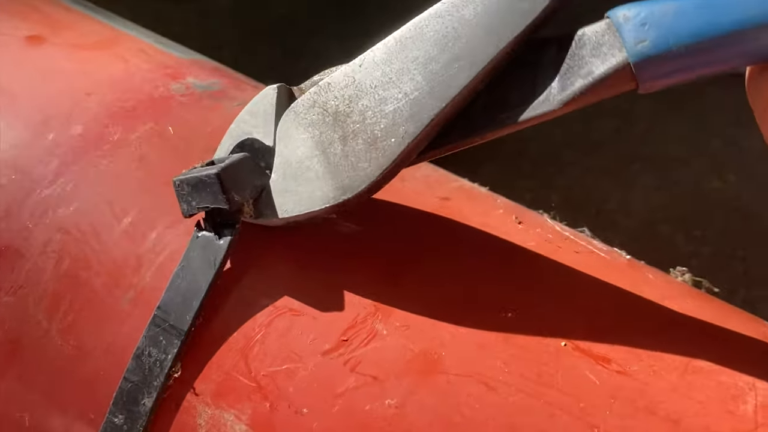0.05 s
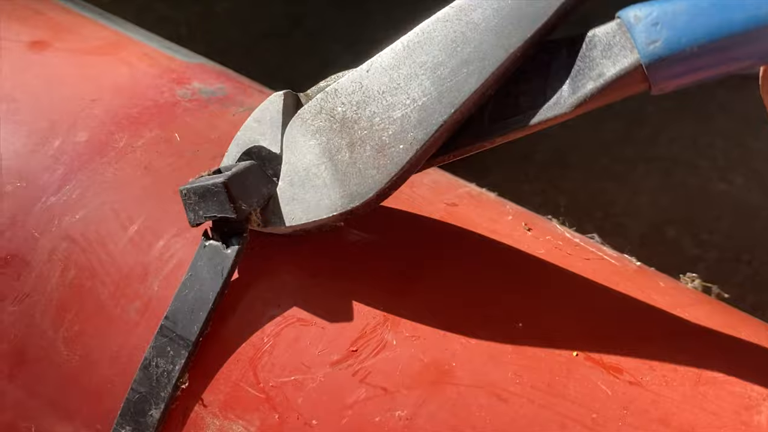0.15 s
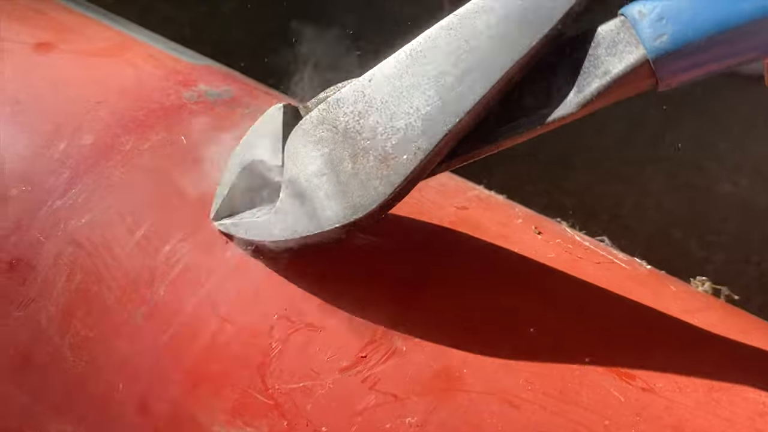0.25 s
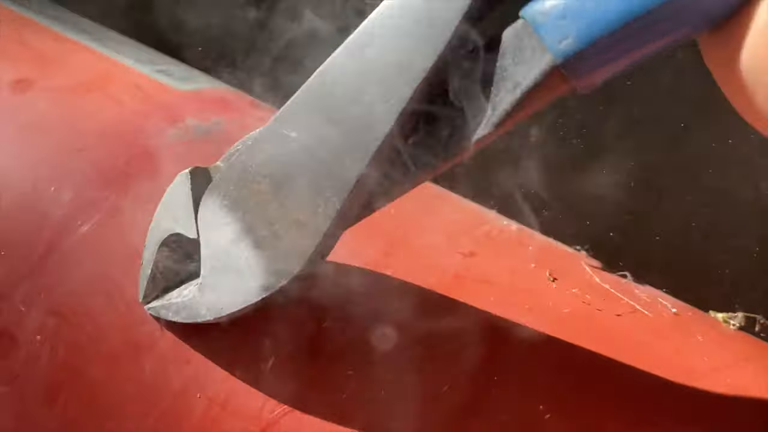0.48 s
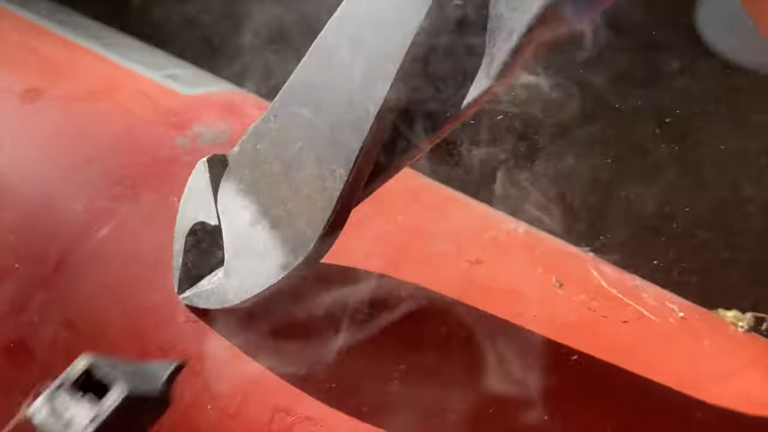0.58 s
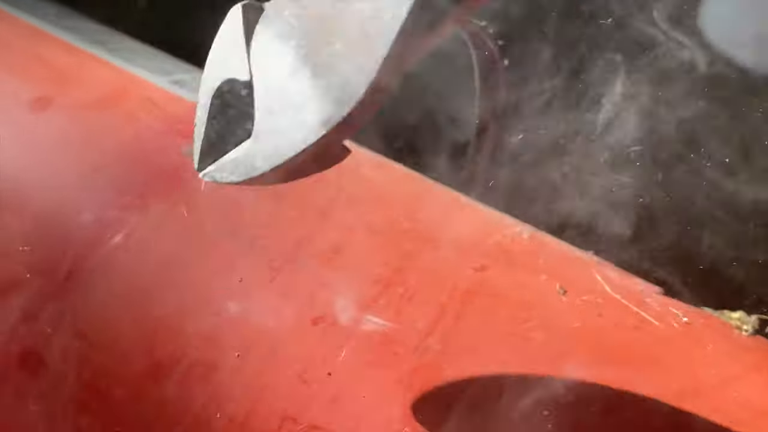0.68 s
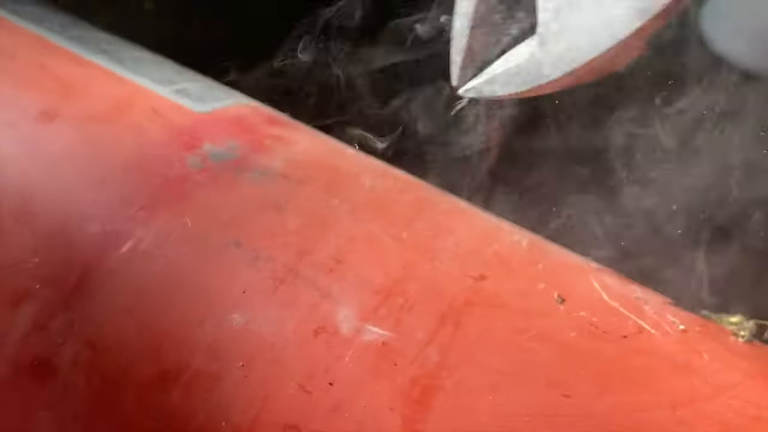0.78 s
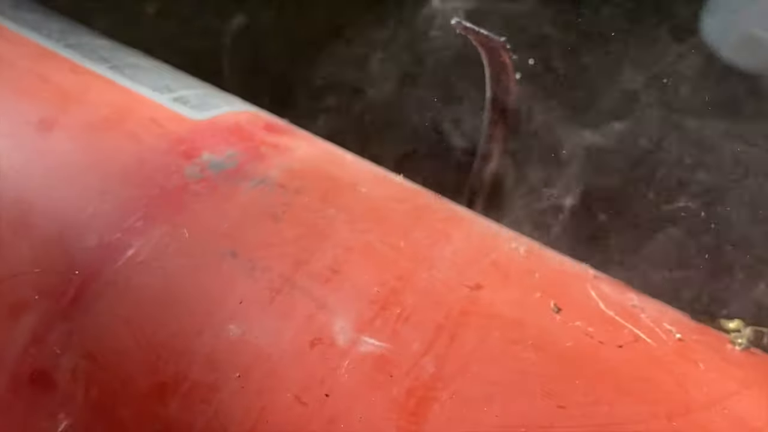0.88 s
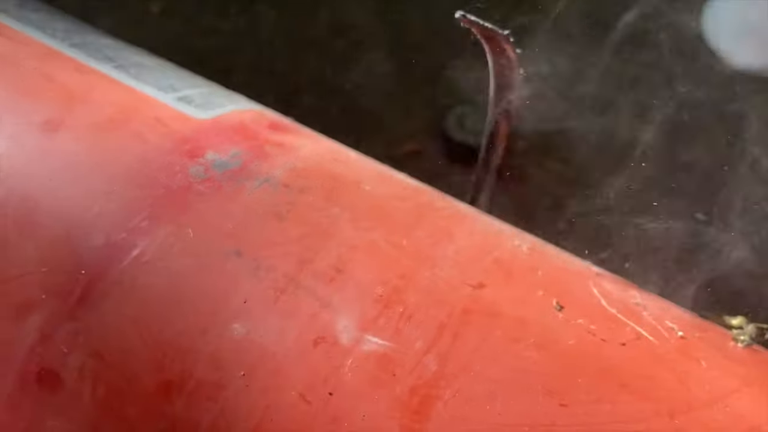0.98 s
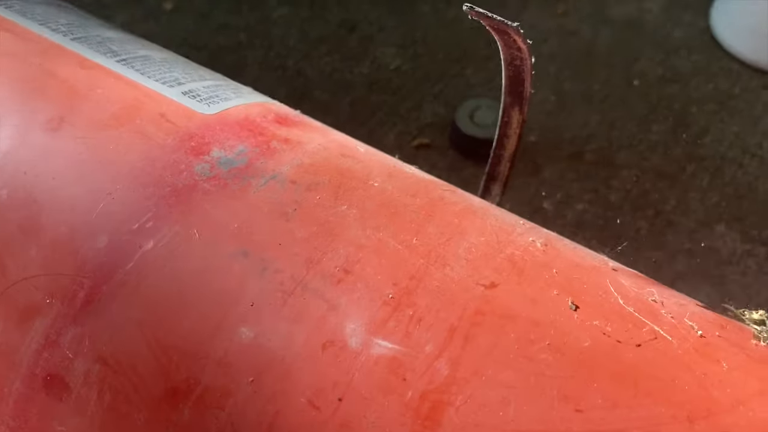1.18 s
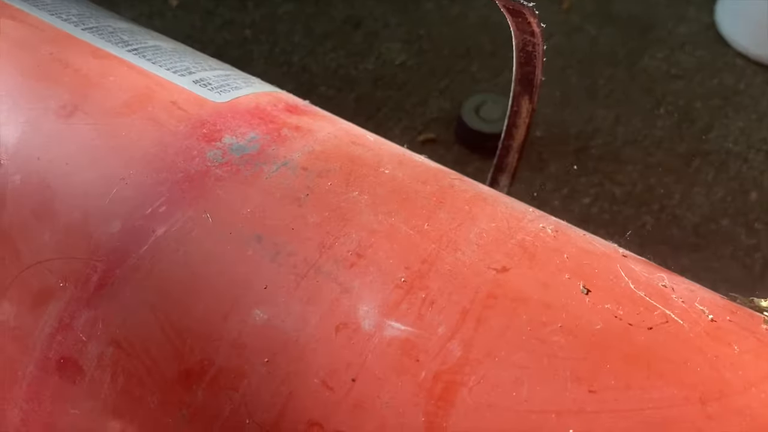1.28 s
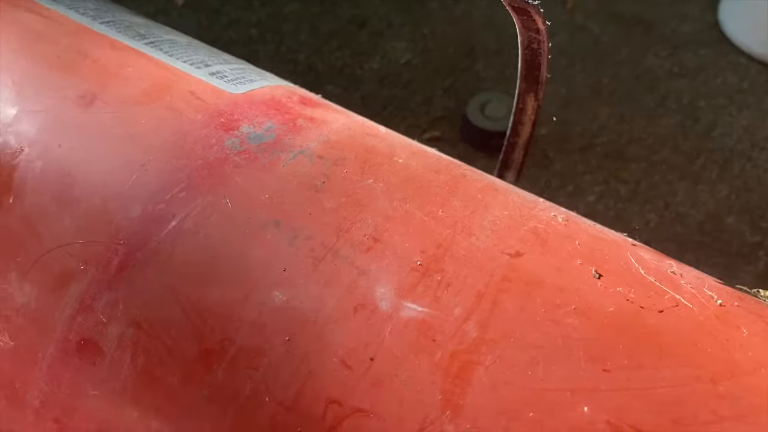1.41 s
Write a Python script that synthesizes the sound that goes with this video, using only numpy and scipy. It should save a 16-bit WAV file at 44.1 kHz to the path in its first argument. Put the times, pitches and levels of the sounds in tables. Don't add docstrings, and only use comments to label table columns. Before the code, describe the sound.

A thick plastic tie creaks and snaps under steel cutters, with a thump and bright metallic rattle

```python
import sys
import numpy as np
from scipy import signal
from scipy.fft import rfft, irfft, next_fast_len
from scipy.io import wavfile
from scipy.ndimage import map_coordinates

SR = 44100
rng = np.random.default_rng(int(sys.argv[2]) if len(sys.argv) > 2 else 0)


def boost_factor(decibels):
    exponent = np.asarray(decibels, float) / 20
    return 10 ** exponent


def bounce(signal):
    frames = np.transpose(np.atleast_2d(signal))
    limited = np.clip(frames, -1, 1)
    pcm = np.round(limited * 32767).astype(np.int16)
    wavfile.write(sys.argv[1], SR, pcm)


N = 63945
LAG_S = 0.00048

# frequency in Hz, level in dB per Hz.
RUMBLE_COLOUR = [(15, -38), (25, -3), (97, -2), (194, -20), (236, -16.5), (700, -33.5), (910, -70),
                 (1540, -120)]
HISS_COLOUR = [(410, -27), (700, -1.5), (961, -9), (1040, -6.5), (7460, -17), (8630, -31.5), (16500, -40.5)]
# frequency in Hz, likeness from 0 to 1.
EAR_LIKENESS = [(40, .1), (150, 1), (1000, 0.043), (8000, 0.058)]
# start in seconds, level in dB, pitch in Hz,
# time to fade by 60 dB in seconds.
HAND_KNOCKS = [(1.1535, -34.5, 75, 0.082), (0.89, -39, 72, 0.085), (1.4385, -34.5, 150, 0.045),
               (1.437, -34, 701, 0.03), (1.437, -30.5, 410, 0.025), (1.4354, -15.5, 4100, 0.0065),
               (1.4352, -30, 1460, 0.0087), (1.4352, -31.5, 2490, 0.011)]
# start in seconds, level in dB.
RUSTLES = [
    (0.2217, -3),
    (0.402, -7.5),
    (0.516, -6),
    (.64, -14),
]
# start in seconds, pitch in Hz, level in dB,
# swell time in seconds, time to fade by 60 dB in seconds.
LONE_RINGS = [(.402, 950, -48, .006, .5), (.511, 950, -50, .004, .25), (.607, 950, -58, .005, .2),
              (.65, 950, -54, .006, .22), (.405, 4430, -62, .02, .5), (.445, 4430, -58, .004, .2),
              (.445, 7220, -62, .004, .2), (.515, 2925, -57, .005, .25), (.517, 10140, -46, .003, .1),
              (.645, 10140, -42, .035, .22), (.645, 2929, -53, .006, .16), (.68, 4430, -59, .006, .2),
              (.648, 6040, -38, .003, .07), (.65, 15550, -57, .005, .2), (1.15, 958, -57, .008, .16),
              (1.149, 4447, -52, .002, .14), (1.155, 10140, -52, .008, .14), (1.158, 12510, -59, .006, .16),
              (1.156, 10550, -50, .005, .08), (1.15, 2960, -60, .003, .12), (1.225, 2050, -63, .012, .14),
              (1.235, 10140, -64, .02, .3), (1.245, 14420, -69, .005, .12), (.652, 11780, -52, .003, .06),
              (.232, 9205, -58, .005, .3)]
# start in seconds, peak in dB,
# time to fade by 60 dB in seconds, left-over-right balance in dB, centre in Hz.
DRY_TICKS = [(0.2205, -13, .014, 13.5, 1980), (0.2241, -2, 0.0063, -2, 4240), (.399, -35, .03, -3, 1050),
             (.3985, -24.5, 0.034, -1.5, 3080), (0.51, -25.5, 0.074, -3, 3900),
             (0.606, -22, 0.009, -1, 5500), (0.63, -25, 0.057, -2.5, 3900), (0.71, -44, 0.0065, 1.5, 13930),
             (0.7437, -39.5, 0.0088, -2, 3800), (1.042, -51, 0.011, 0, 12900),
             (.759, -50, .007, -0.5, 12900), (1.257, -52.5, 0.011, -0.5, 1210),
             (1.113, -52, 0.014, 4, 1500), (1.1488, -37, 0.03, -5.5, 5000), (1.4354, -20, 0.0076, -1, 3470),
             (1.438, -35, 0.06, -3, 3030)]
# start in seconds, crack peak in dB, knock peak in dB.
SLIPS = [(0.0187, -41, -48), (.042, -34.5, -41), (0.0637, -37, -39.5), (0.0887, -29.5, -35.5),
         (0.1343, -27, -39), (0.1797, -25, -40), (0.2122, -30, -36)]
# centre in Hz, width in Hz, level in dB.
CRACK_TONE = [(2730, 1580, -3.5), (4300, 1600, -3), (7400, 1300, -9.5), (10370, 1800, -16),
              (14840, 2200, -21), (3300, 900, -12)]
# centre in Hz, width in Hz, level in dB.
CYLINDER_TONE = [(257, 96, -2.5), (461, 70, 0), (767, 48, 1.5), (953, 19, 8)]
# start in seconds, level in dB, attack in seconds,
# hold in seconds, rattle in dB.
BLOWS = [(0.223, -30, 0.00074, 0.00091, 1), (0.3973, -44.5, 0.0067, 0.0013, 7.5),
         (0.5091, -29, 0.0053, 0.0074, 6.5), (0.6331, -21, 0.00079, 0.017, -1),
         (1.15, -37.5, 0.00041, 0.006, 5), (0.449, -59.5, 0.0059, 0.053, -4),
         (.648, -34.5, 0.0025, 0.0095, 5), (1.0255, -54, .0005, 0.004, 6), (1.131, -49, 0.002, .012, 10),
         (1.2465, -49, 0.0005, 0.0063, 6.5), (0.56, -51.5, 0.0029, 0.003, 7), (1.44, -43, 0.001, 0.0038, 4),
         (.298, -56, .002, 0.0089, 7), (.342, -59, .002, .008, 5)]
# pitch in Hz, level in dB,
# time to fade by 60 dB in seconds.
CUT_RING = [(788, -3, 0.09), (947, -13.5, 0.18), (1886, -3, 0.07), (2925, -9, 0.17), (3250, -5.5, 0.11),
            (6684, 0, 0.1), (7779, -13, 0.15), (4872, -18.5, .25), (9600, -14.5, .077), (9900, -25, .15),
            (10980, -24, .1)]
TAP_RING = [(950, -20, .1), (1860, -6, 0.15), (2850, -0.5, 0.093), (4240, -10.5, 0.22), (10300, -17, 0.019)]
SLACK_RING = [(950, -30, 0.1), (2980, -21, 0.22), (4416, -3.5, 0.061), (5430, -20, 0.039),
              (5620, -17.5, 0.066), (6130, -9, 0.074), (7160, 0, 0.053), (7600, -11.5, 0.057),
              (10440, -11, 0.07), (12520, -22, 0.05), (15540, -15, 0.068)]
CLINK_RING = [(973, -37, 0.11), (2970, -26.5, 0.13), (3951, -27.5, 0.071), (4430, -19, 0.053),
              (5890, -15.5, 0.092), (6100, -21.5, 0.19), (7220, 1, 0.031), (10120, -26, .35),
              (11790, -46, 0.146), (12530, -25, 0.05), (15550, -45.5, .2)]
SHAKE_RING = [(967.6, -21, 0.2), (1970, -19.5, 0.099), (3030, -15.5, 0.086), (3730, -22, 0.063),
              (4370, -12.5, 0.13), (6160, -6, 0.054), (7220, -6, 0.1), (10140, -37, 0.15),
              (10560, -19.5, 0.116), (12510, -35, 0.15), (14420, -21, 0.067), (15550, -23, 0.13)]
# multiple of its pitch, left level in dB, right level in dB,
# share of the swell.
SQUEAL_TONES = [(1.43, -31, -47, 0.88), (1.16, -33.5, -42, 0.6), (2.37, -23, -55.5, 0.86),
                (4, -34, -35, 1.1), (5, -25.5, -56.5, 0.5), (6, -8, -50.5, 1.3)]
# centre in Hz, half width in Hz, depth in dB.
TREBLE_BITES = [(8797, 656, -10.5), (13400, 650, -34)]


def unit(x):
    return x / np.sqrt(np.mean(x ** 2) + 1e-20)


def along(points, hz):
    f, v = np.transpose(points)
    return np.interp(np.log(hz + 1), np.log(f + 1), v)


def wobble(rate, size):
    knots = rng.standard_normal(size // 32 + 4)
    return map_coordinates(knots, [np.arange(size) * rate / SR])


def filtered(x, response):
    n = x.shape[-1]
    m = next_fast_len(n + 8192)
    return irfft(rfft(x, m) * response(np.fft.rfftfreq(m, 1 / SR)), m)[..., :n]


def resonances(rows):
    def response(f):
        total = 0
        for k, (centre, width, db) in enumerate(rows):
            loss = 1j * f * width
            total = total + (-1) ** k * boost_factor(db) * loss / (centre * centre - f * f + loss)
        return total
    return response


def add(out, x, s, pan_db, lag=LAG_S):
    x = x * boost_factor(np.array([[pan_db / 2], [-pan_db / 2]]))
    delays = np.clip(-pan_db / 2, 0, 1) * np.array([lag / 2, -lag / 2])
    for track, sound, late in zip(out, x, delays):
        part = track[round((s + late) * SR):][:len(sound)]
        part += sound[:len(part)]


def since(count):
    return np.arange(count) / SR


def pair(size, alike):
    a, b = rng.standard_normal((2, size))
    u = np.arccos(np.clip(alike, -1, 1)) / 2
    return np.array([np.cos(u) * a + np.sin(u) * b, np.cos(u) * a - np.sin(u) * b])


def rush(colour):
    def split(hz):
        turn = np.arccos(np.clip(along(EAR_LIKENESS, hz), -1, 1)) / 2
        return boost_factor(along(colour, hz)) * [np.cos(turn), np.sin(turn)]
    mid, side = filtered(rng.standard_normal((2, N)), split)
    left = np.roll(mid + side, round(LAG_S * SR))
    return np.array([left, mid - side]) / mid.std()


def yard():
    duck_s, recover_s = 0.258, 0.14
    t = since(N)
    duck = (t > duck_s) * np.exp(-(np.maximum(t - duck_s, 0) / recover_s) ** 2)
    rumble = boost_factor(-51.5 - 23.5 * duck + 1.8 * wobble(23, N)) * rush(RUMBLE_COLOUR)
    hiss = boost_factor(-67.5 - 8 * duck + 1.3 * wobble(7.6, N)) * rush(HISS_COLOUR)
    return rumble + hiss


def handling():
    out, t = np.zeros((2, N)), since(13000)
    for s, db, hz, t60 in HAND_KNOCKS:
        knock = boost_factor(db - 60 * t / t60) * (1 - np.exp(-t / 0.00084)) * np.sin(2 * np.pi * hz * t)
        add(out, knock, s, -3, lag=0)

    scrape_s, scrape_long_s, scrape_db, scrape_hz = 1.06, 0.12, -64, 2680
    narrow = resonances([(scrape_hz, 250, 0)])
    scrape = unit(filtered(pair(len(t), 0.37), lambda f: narrow(f) ** 2))
    stroke = np.sin(np.pi * np.clip(t / scrape_long_s, 0, 1))
    add(out, boost_factor(scrape_db + 1.6 * wobble(74, len(t))) * stroke * scrape, scrape_s, -1.5)

    papery = resonances([(3180, 670, 1.5), (6440, 1700, 1.5), (10100, 990, -9.5),
                         (4700, 540, -0.5), (15200, 1450, -12)])
    for s, db in RUSTLES:
        rustle = unit(filtered(pair(len(t), 0.38), papery))
        level = boost_factor(-53 + db - 60 * t + 1.6 * wobble(50, len(t)))
        add(out, level * rustle, s, 0.3)
    return out


def singing():
    out, t = np.zeros((2, N)), since(13000)
    for s, hz, db, swell, t60 in LONE_RINGS:
        waver = 2.8 * min(hz / 5000, 1) * wobble(140, len(t))
        level = boost_factor(db - 60 * t / t60 + waver) * (1 - np.exp(-t / swell))
        drift = 0.6 * wobble(90, len(t)) * min(hz / 6000, 1)
        tone = np.sin(2 * np.pi * hz * t + drift + [[0.55], [-0.55]])
        add(out, level * tone, s, -1.2, lag=0)
    return out


def ticks():
    out, t = np.zeros((2, N)), since(9000)
    edge = resonances([(7350, 1500, -14.5), (16000, 1400, -26)])
    for s, db, t60, pan, hz in DRY_TICKS:
        body = resonances([(hz, 1.56 * hz, 0)])
        steepness = 2 + (hz < 2500)
        brightness = min(hz / 4000, 1) ** 3
        answer = boost_factor(-22.5 - 60 * t / 0.096)
        shape = (1 - np.exp(-t / 0.00018)) * boost_factor(-60 * t / t60) + answer
        burst = filtered(pair(len(t), 0.2) * shape, lambda f: body(f) ** steepness + brightness * edge(f))
        add(out, boost_factor(db) * burst / abs(burst).max(), s, pan)
    return out


def creak():
    out, t = np.zeros((2, N)), since(2600)
    for s, db, knock_db in SLIPS:
        fade = boost_factor(-60 * t / 0.0037) + boost_factor(-28 - 60 * t / 0.07)
        crack = filtered(pair(len(t), 0.64) * fade, resonances(CRACK_TONE))
        knock = filtered(t * np.exp(-t / 0.00015), resonances(CYLINDER_TONE))
        add(out, boost_factor(db) * crack / abs(crack).max(), s, -2.5)
        add(out, boost_factor(knock_db) * knock / abs(knock).max(), s, -2.5, lag=0)

    t = since(9000)
    groan = unit(filtered(pair(len(t), 0.37), resonances(CYLINDER_TONE + [(1980, 2200, -15.5)])))
    strain = boost_factor(-58.5 + 3.3 * wobble(46, len(t))) * np.sin(np.pi * t / t[-1])
    add(out, strain * groan, 0.02, -1.5)
    return out


def jaws():
    grit_db, grit_hz, grit_t60, grain_db = -0.5, 5500, 0.062, 5.5
    struck = [CUT_RING, TAP_RING, SLACK_RING, CLINK_RING, SHAKE_RING, SLACK_RING, SHAKE_RING,
              SHAKE_RING, SHAKE_RING, SHAKE_RING, TAP_RING, SLACK_RING, SHAKE_RING, SHAKE_RING]
    out, t = np.zeros((2, N)), since(13000)
    gritty = resonances([(grit_hz, grit_hz, 0)])
    for (s, db, attack, hold, rattle_db), modes in zip(BLOWS, struck):
        free = np.maximum(t - hold, 0)
        rise = 1 - np.exp(-t / attack)
        grit_level = rattle_db + grit_db + grain_db * wobble(770, len(t)) - 60 * free / grit_t60
        grains = boost_factor(grit_level) * pair(len(t), 0.44)
        ring = filtered(grains, lambda f: boost_factor(-12.5) * gritty(f) ** 2)
        for hz, level, t60 in modes:
            lead = rng.uniform(0.33, 0.84) * np.array([[1], [-1]]) + rng.uniform(0, 7.27)
            chatter = np.tanh(wobble(180, len(t))) * np.exp(-free / 0.053)
            flutter = min(hz / 5000, 1) * rattle_db * chatter
            tone = np.sin(2 * np.pi * hz * t + lead + 0.06 * flutter)
            ring = ring + boost_factor(level + flutter - 60 * free / min(t60, 0.3)) * tone
        add(out, boost_factor(db) * rise * ring, s, -0.8, lag=0)
    return out


def cut():
    squeal_hz, squeal_s, squeal_end_s, swell_db = 1360, 0.195, 0.24, 29
    out, t = np.zeros((2, N)), since(1500)
    left = np.clip(1 - t / (squeal_end_s - squeal_s), 0, 1)
    for k, left_db, right_db, share in SQUEAL_TONES:
        swell = boost_factor(-swell_db * share * left) * (1 - np.exp(-t / 0.0045)) * (left > 0)
        tone = np.sin(2 * np.pi * k * squeal_hz * t + 0.79 * wobble(600, len(t)))
        tone = tone * boost_factor(2.8 * wobble(504, len(t)))
        add(out, swell * tone * boost_factor(np.array([[left_db], [right_db]])), squeal_s, 0, lag=0)

    thump_hz, sag_per_s = 290, 115
    t = since(13000)
    cycles = thump_hz * (1 - np.exp(-sag_per_s * t)) / sag_per_s
    thump = boost_factor(-6 - 60 * t / 0.027) * np.sin(2 * np.pi * cycles) * (1 - np.exp(-t / 0.00012))
    heave = boost_factor(-45.5 - 60 * t / 0.32) * np.sin(2 * np.pi * 102 * t)
    add(out, thump + heave, 0.2262, -1.6, lag=0.00033)
    return out


def scene():
    return yard() + handling() + singing() + ticks() + creak() + jaws() + cut()


def roll_off(x):
    return signal.sosfilt(signal.butter(12, 17000, fs=SR, output="sos"), x)


def record(dry):
    low_hz, top_hz = 40.8, 16400

    def tone_curve(f):
        bites = boost_factor(sum(db * np.exp(-((f - hz) / half) ** 4) for hz, half, db in TREBLE_BITES))
        treble_end = np.clip((top_hz - f) / 700, 0, 1)
        bass_end = (1j * f / (1j * f + low_hz)) ** 2
        return bites * treble_end * bass_end

    return roll_off(filtered(dry, tone_curve))


dry = scene()
out = record(dry)
bounce(out)
```